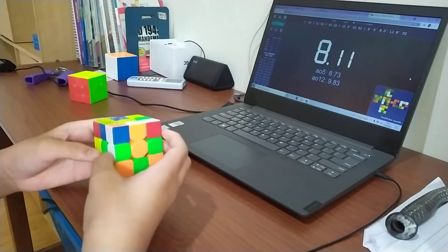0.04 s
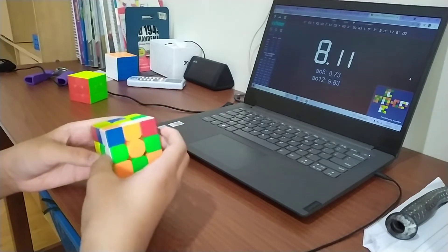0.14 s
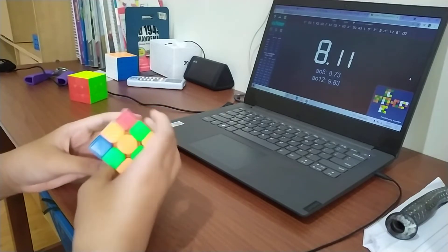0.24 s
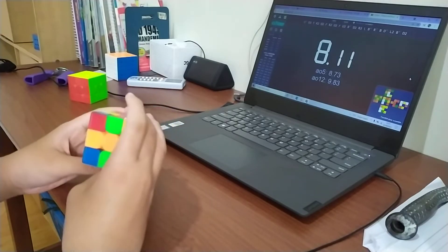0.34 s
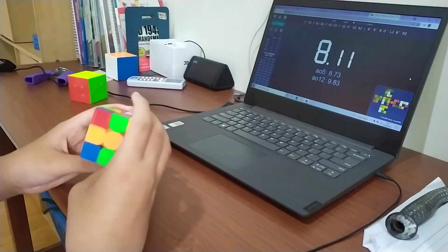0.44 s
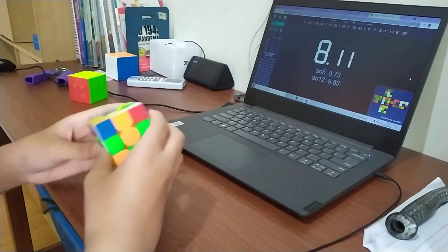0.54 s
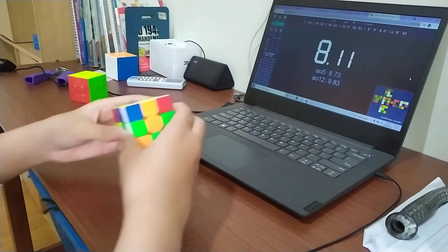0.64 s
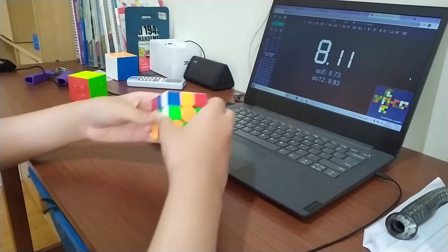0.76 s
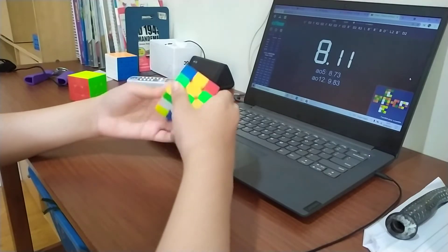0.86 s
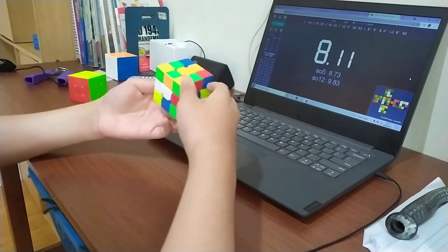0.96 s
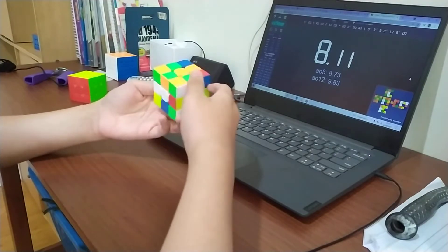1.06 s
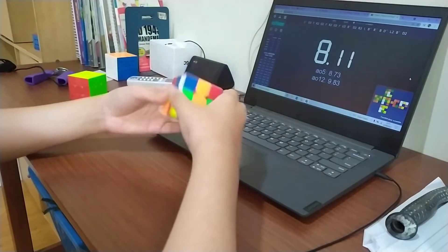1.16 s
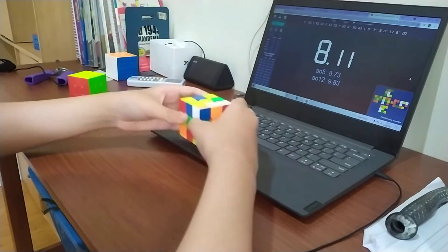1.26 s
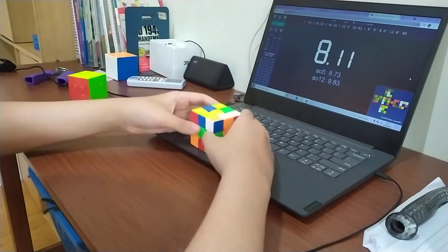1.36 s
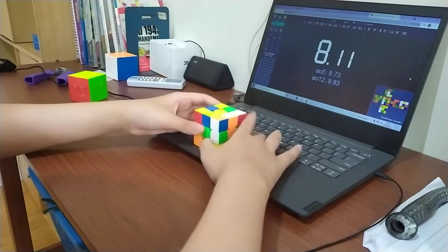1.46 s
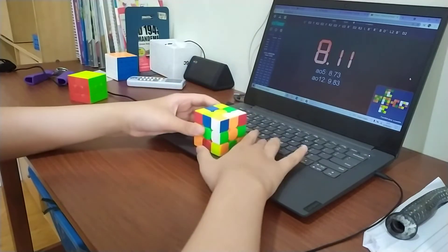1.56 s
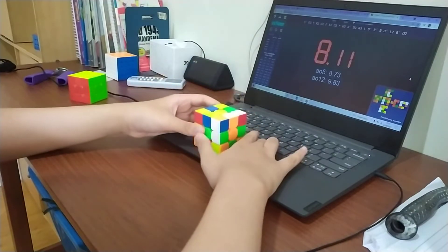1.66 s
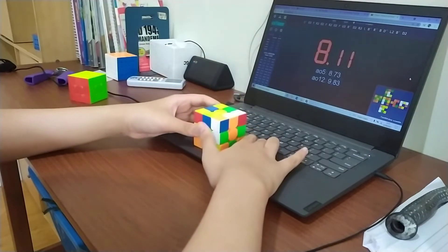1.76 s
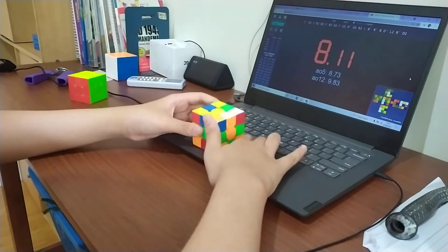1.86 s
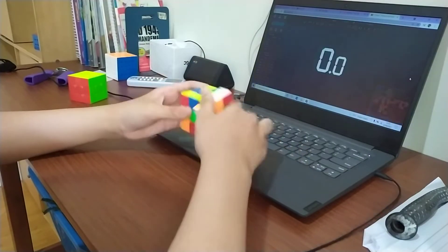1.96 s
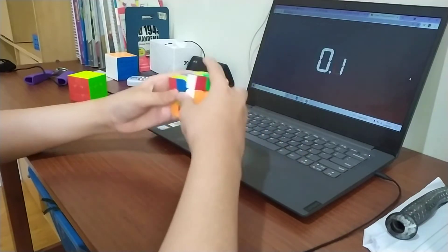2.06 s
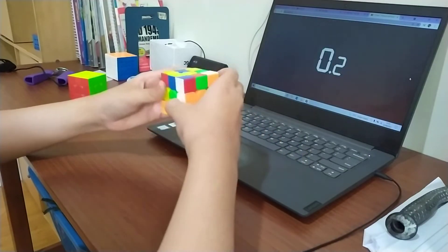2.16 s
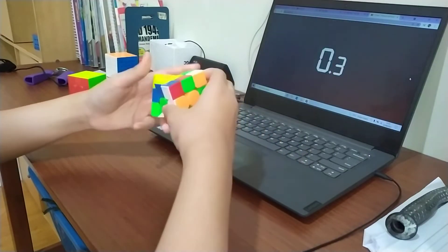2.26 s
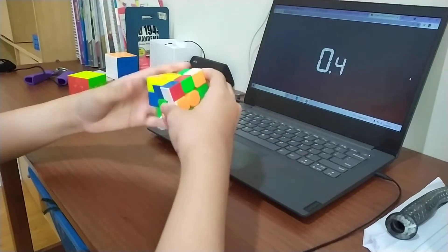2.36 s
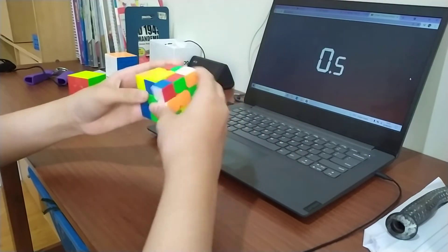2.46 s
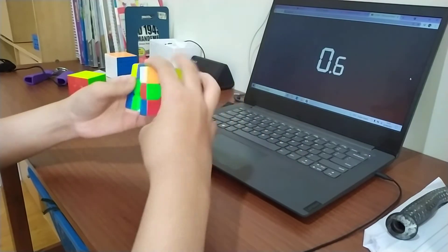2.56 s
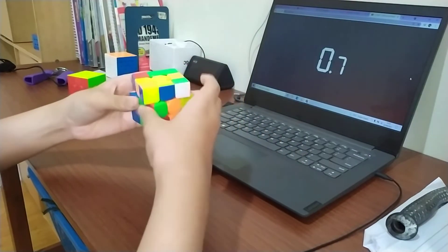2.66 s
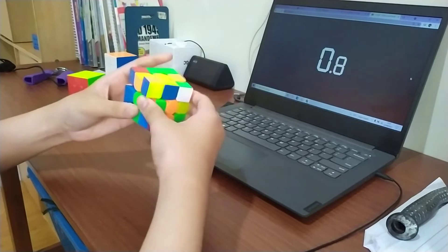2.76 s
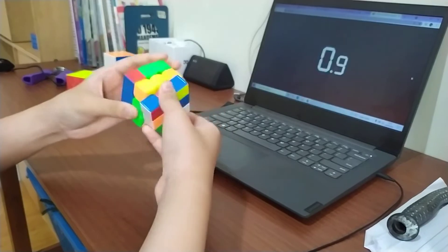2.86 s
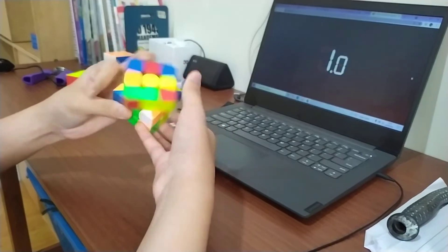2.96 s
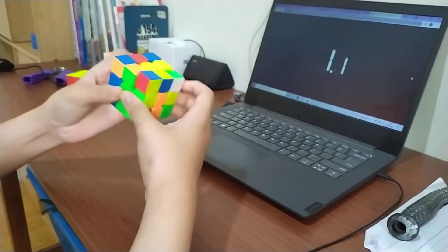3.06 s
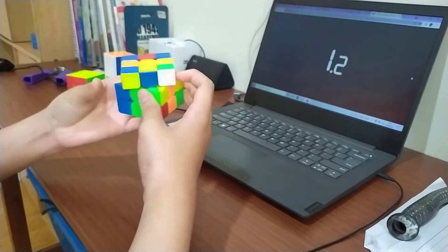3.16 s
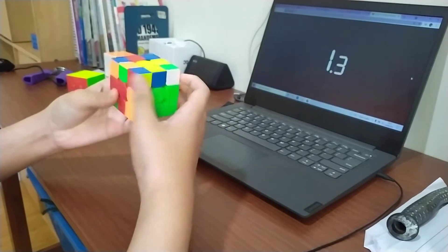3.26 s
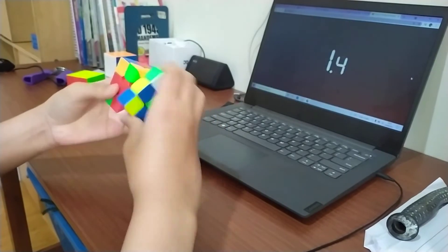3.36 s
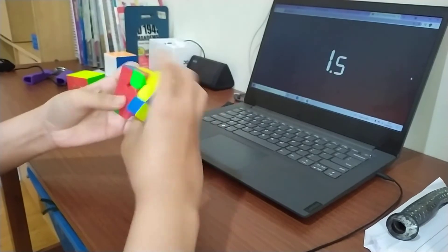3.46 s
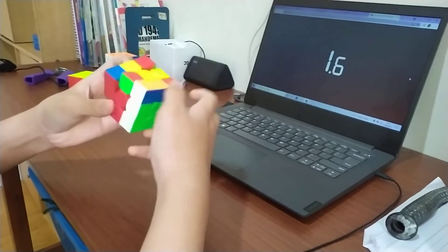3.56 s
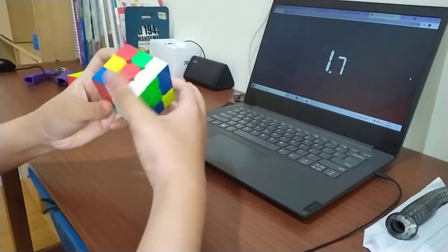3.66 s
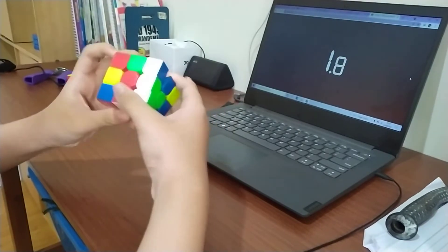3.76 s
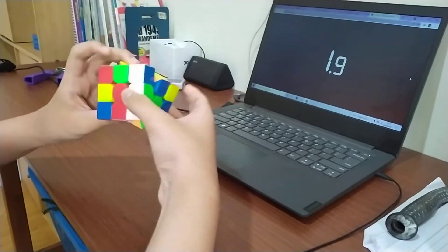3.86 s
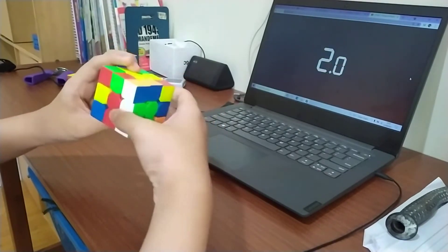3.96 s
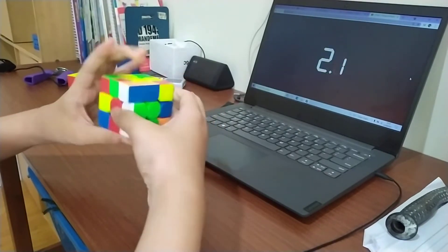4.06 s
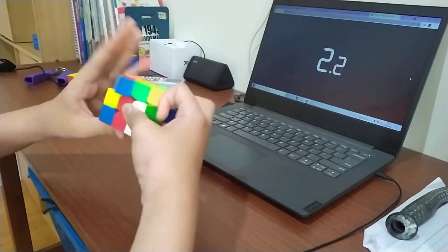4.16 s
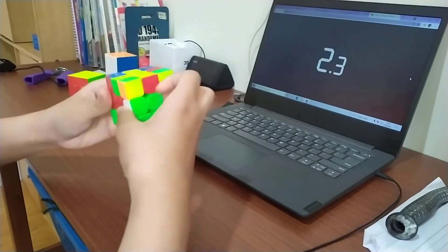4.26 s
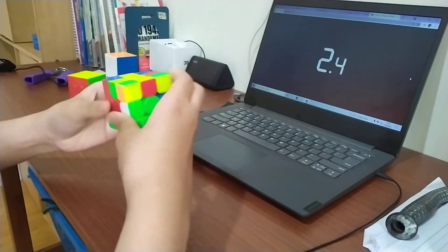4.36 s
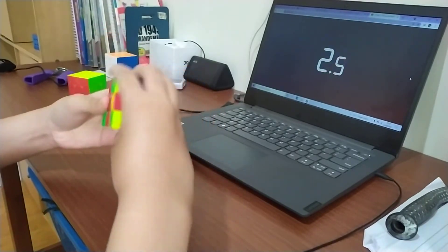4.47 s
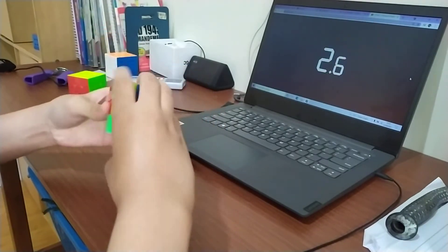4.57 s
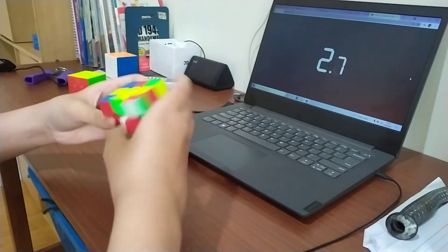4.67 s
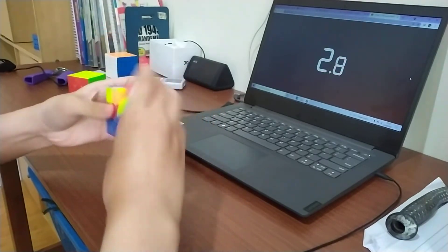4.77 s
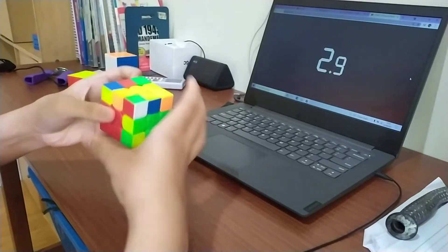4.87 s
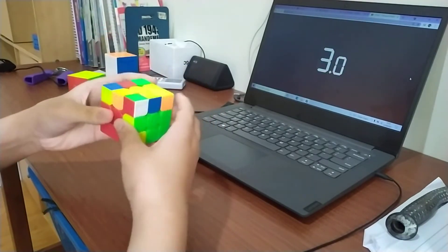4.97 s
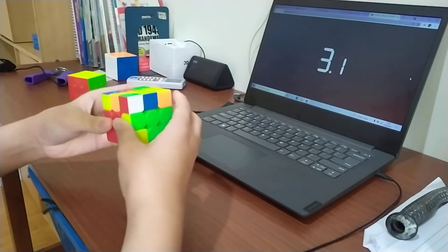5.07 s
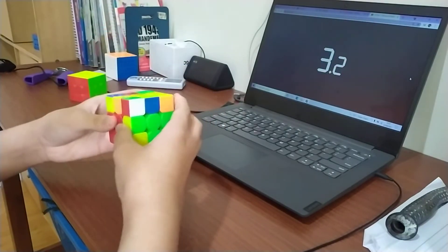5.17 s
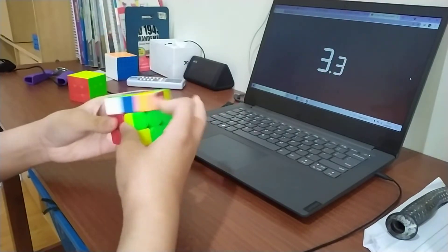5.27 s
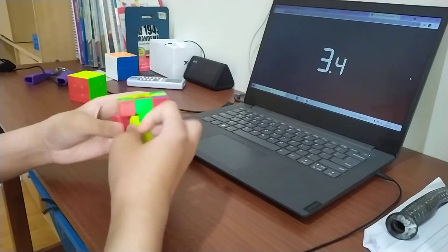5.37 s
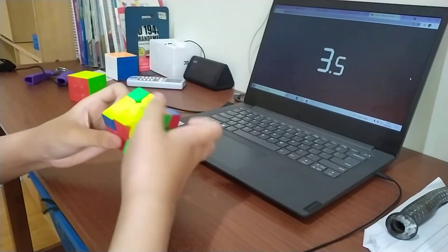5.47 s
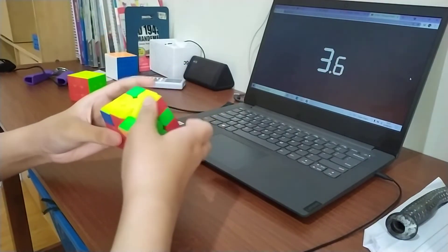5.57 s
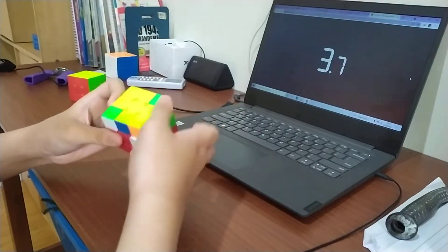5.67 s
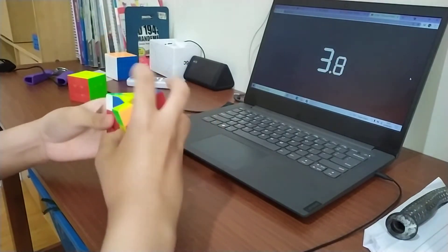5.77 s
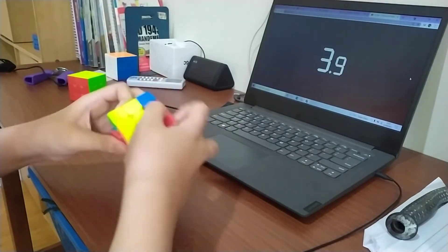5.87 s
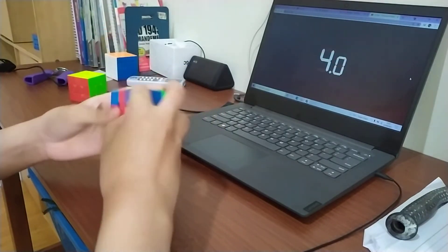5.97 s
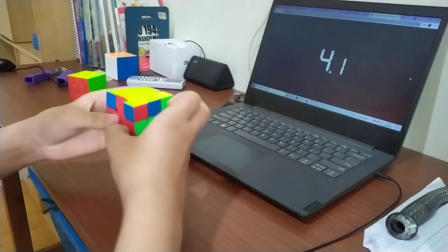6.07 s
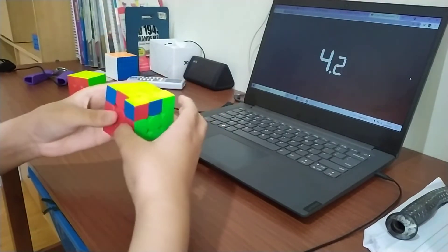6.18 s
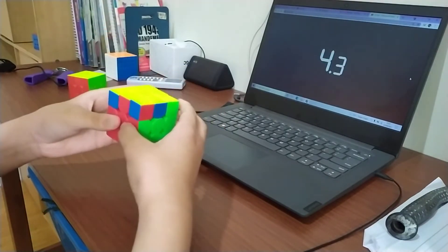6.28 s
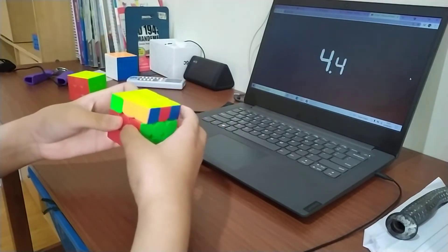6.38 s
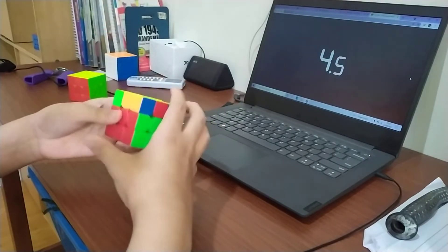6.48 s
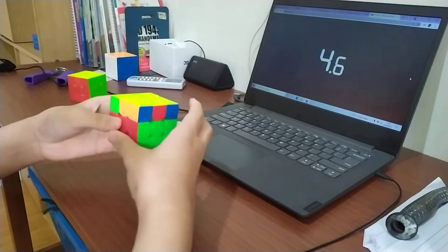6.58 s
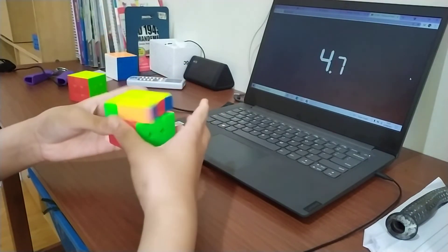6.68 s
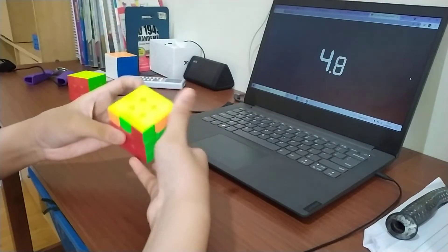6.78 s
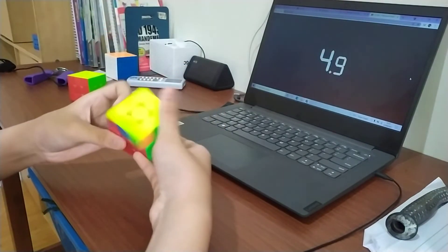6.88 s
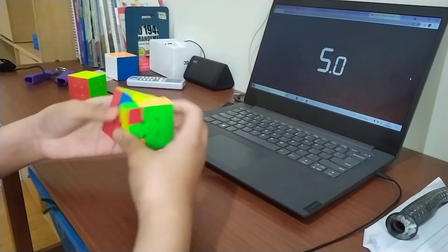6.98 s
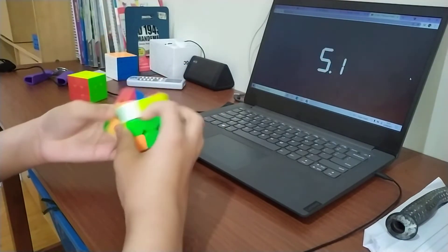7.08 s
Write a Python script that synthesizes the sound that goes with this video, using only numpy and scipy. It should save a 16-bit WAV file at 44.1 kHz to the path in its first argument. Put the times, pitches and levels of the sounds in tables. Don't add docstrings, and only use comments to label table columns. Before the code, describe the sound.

Rapid bright plastic clicks and fine rattles from a speed-turned puzzle cube, in uneven flurries over a desk, with faint hum beneath.

```python
import sys
import numpy as np
from scipy import signal
from scipy.io import wavfile

SR = 44100
rng = np.random.default_rng(int(sys.argv[2]) if len(sys.argv) > 2 else 0)


def boost_factor(decibels):
    exponent = np.asarray(decibels, float) / 20
    return 10 ** exponent


def output_pcm(signal):
    pcm = np.clip(np.atleast_2d(signal).T, -1, 1) * 32767
    wavfile.write(sys.argv[1], SR, np.round(pcm).astype(np.int16))


N = 314400

HANDLING = [(1.141, -42, -17, 0.76), (1.3872, -24, -11, 0.85), (1.4033, -36.5, -3, 2.7),
            (1.5097, -34.5, -34, 3.2), (1.538, -30.5, -15.5, 4.7), (1.8908, -46, -12.5, 0.49),
            (1.9118, -39.5, -16, 3.15), (1.9909, -29.5, -4.5, 1.16), (2.008, -30.5, -7.5, 3.6),
            (2.02, -41, -39, 2.4), (2.03, -29, -38, 1.6), (2.1272, -37, -9, 1.3)]
# seconds, dB, dB, milliseconds.
FIRST_RUN = [(2.236, -23.5, -8.5, 0.38), (2.2433, -49, -36, 1.3), (2.2605, -25.5, -13, 3.2),
             (2.2685, -19, -12.5, 1.3), (2.2744, -14, -34, 0.56), (2.2945, -14.5, -17.5, 0.54),
             (2.384, -28, -26, 1.4), (2.3975, -33.5, -8, 1.4), (2.4352, -12.5, -18.5, 1.27),
             (2.466, -15, -24, 1.33), (2.5124, -31.5, -2.5, 6.3), (2.61, -37.5, -3, 1.3),
             (2.6495, -16, -17.5, 1.83), (2.7563, -44.5, -11, 2.8), (2.8277, -40, -5, 1.9),
             (2.8395, -31, -13, 2.4), (2.8792, -33, -13.5, 5.9), (2.905, -28, -19.5, 0.41),
             (2.954, -38.5, -9, 1.9), (2.9687, -19.0, -15, 4), (2.9831, -6.5, -24.5, 0.64),
             (2.998, -12.5, -16, 0.98), (3.1518, -24, -16.5, 2.26)]
# seconds, dB, dB, milliseconds.
LATER_TURNS = [(3.2416, -19, -22, 2.6), (3.258, -14, -33, 0.37), (3.2678, -20, -21.5, 0.77),
               (3.326, -30.5, -15.5, 2.0), (3.3432, -29, -21, 1.52), (3.3773, -21.5, -11.5, 1.8),
               (3.4435, -21.5, -12.5, 3.5), (3.4676, -9, -17.5, 1.8), (3.4854, -31.5, -18, 3.2),
               (3.51, -17.5, -21.5, 1.3), (3.5275, -16.5, -27, 2), (3.677, -34.5, -10, 3.3),
               (3.7006, -18.5, -19.5, 0.79), (3.808, -34.5, -13, 1.3), (3.823, -30, -19.5, 3.8),
               (3.9298, -37.5, -14, 3.3), (3.9494, -14.5, -32, 0.54), (3.9615, -23, -25, 3.1),
               (4.0842, -31.5, -16, 3.6), (4.1175, -40.5, -13.5, 2.2), (4.125, -37, -15, 5.4),
               (4.142, -34, -6, 1.84), (4.162, -22, -12.5, 3), (4.1695, -21.5, -37.5, 1.8),
               (4.1903, -28.5, -11, 1.04), (4.2282, -19, -20, 3.4), (4.249, -14.5, -23, 1.66),
               (4.2662, -14, -18, 2), (4.2854, -13, -38, 0.54),
               (4.425, -38.5, -9, 2), (4.453, -50.5, 8, 1.5), (4.4634, -16.5, -18, 1.34),
          (4.4806, -11.5, -13.5, 0.55), (4.5087, -32.5, -16, 3.6), (4.5531, -42, -3, 1.9),
          (4.5845, -16, -14.5, 3.5), (4.592, -15, -22, 2.54), (4.6542, -23.5, -9, 2.8),
          (4.685, -8.5, -19.5, 0.69), (4.7086, -14.5, -28.5, 2.7), (4.7193, -7, -19.5, 4.5),
          (4.746, -11, -32.5, 1.4), (4.7673, -5.5, -23, 0.54), (4.8184, -10, -13, 2.7),
          (4.831, -12, -21, 1.5), (4.8438, -10.5, -29, 2.5), (4.8493, -8.5, -20.5, 5.9),
          (4.868, -25.5, -25.5, 3.8), (4.888, -24, -30.5, 2.2), (5.0364, -23.5, -30.5, 1.2),
               (5.2963, -20.5, -14, 4.9), (5.3267, -18.5, -21, 1.9), (5.3432, -15.5, -28.5, 1.4),
              (5.3524, -13, -54, 0.4), (5.3882, -31, -15, 3.9), (5.4585, -19.5, -15.5, 2.0),
              (5.475, -15, -21, 1.9), (5.487, -15.5, -16, 5), (5.6393, -24.5, -26, 1.7),
              (5.658, -38.5, -1, 1.3), (5.6722, -19, -13, 0.74), (5.6795, -24, -19, 1.2),
              (5.6848, -20, -17.5, 2.3), (5.704, -13.5, -39, 2.6), (5.743, -25.5, -10.5, 3.3),
              (5.751, -19.5, -9, 2.3), (5.77, -20.5, -23, 0.8), (5.788, -20, -25, 1.2),
              (5.809, -27.5, -12.5, 6.1), (5.8363, -19.5, -18, 2.2), (5.8504, -5, -13, 3.2),
              (5.9576, -22.5, -17, 2.2), (5.965, -30, -18, 2.5), (5.983, -11, -10, 1.8),
              (5.995, -24, -19, 1.7),
               (6.25, -20.5, -20, 1.2), (6.2628, -34.5, -36.5, 5.5), (6.33, -35, -18, 1.7),
               (6.3645, -33.5, -2, 1.3), (6.3719, -20, -17, 2.1), (6.3924, -15.5, -21, 1.8),
               (6.4553, -27, -30, 0.56), (6.6975, -21.5, -21.5, 1.6), (6.731, -29, -11.5, 2.1),
               (6.7347, -16, -36.5, 2.4), (6.764, -24.5, -9.5, 1.4), (6.8067, -26.5, -28, 2.5),
               (6.8812, -32.5, -11.5, 1.7), (6.905, -19, -27, 0.24), (6.925, -27.5, -35.5, 2.2),
               (6.9302, -23, -8.5, 3.7), (6.9792, -21, -13.5, 4.8), (7.0284, -7, -21.5, 0.13),
               (7.0425, -4, -21, 0.64), (7.0685, -8, -17, 2.2), (7.092, -20.5, -28, 0.97),
               (7.108, -11.5, -27.5, 1.5)]
# seconds, dB, dB, milliseconds.
IDLE_TICK = [
    (.772, -54, -23, 1.5),
]
# seconds, dB, dB, #
# milliseconds.
FURTHER_SNAPS = [
    (2.964, -28, -12, 1.4),
    (2.998, -7.5, -20, 0.41),
    (3.3424, -13, -24, 1.1),
    (5.3522, -7, -36, .4),
    (5.8355, -16, -24, 1.16),
                 (1.4086, -32.5, -11.5, 2.3), (1.92, -40.5, -25, 1.1), (1.931, -44.5, -25, 1),
                (1.9725, -45, -21, 1), (2.3105, -33.5, -15.5, 1.5), (2.409, -29, -12, 0.87),
                (2.522, -23, -19, 0.94), (2.552, -33, -5.5, 2.3), (2.5685, -34.5, -3.5, 2.3),
                (2.8897, -37, -19.5, 1.2), (2.9, -42, -21, 1), (2.9726, -25.5, -15, 0.87),
                (3.007, -24.5, -21.5, 1.8), (3.041, -26, -24.5, .8), (3.06, -32.5, -5, 2.3),
                (3.229, -44, -14, 1), (3.2623, -24, -20, 1), (3.426, -30.5, -16.5, 1),
                (3.519, -19.5, -13.5, 1.5), (3.7536, -37.5, -17.5, 1.1), (3.804, -25.5, -14.5, 1),
                (3.884, -44, -5, 2.3), (4.0435, -33.5, -18, 1), (4.0662, -36, -13, 1.3),
                (4.135, -35, -20.5, 1.1), (4.5948, -14.5, -21, 1.2), (4.739, -16, -20, 3.4),
                (4.8545, -14.5, -33.5, 1.6), (5.335, -22.5, -27.5, 0.45), (5.8447, -15, -37, 1.2),
                (5.855, -6, -27, 1.45), (5.871, -17, -8, 1.8), (5.979, -20, -11, 1.5),
                (6.389, -22.5, -18.5, 1), (6.9123, -34, -3.5, 2), (7.083, -22, -9, 1.2)]


def all_snaps():
    turns = FIRST_RUN + LATER_TURNS
    rows = HANDLING + turns + IDLE_TICK + FURTHER_SNAPS
    s, db, hollow_db, seat_ms = np.transpose(rows)
    bright_db = 7 + 0.2314 * db + np.log2(np.maximum(seat_ms, .2))
    bright_db += 1.5 * (s < FIRST_RUN[0][0])
    return np.transpose([s, db, bright_db, hollow_db, seat_ms])


def contacts(count=10):
    snaps = all_snaps()
    s, seat_s = snaps[:, :1], np.maximum(snaps[:, 4:], .2) / 1000
    late = rng.gamma(1.5, 1, (len(s), count)) * .5
    sizes = boost_factor(-3.5 * late) * rng.choice([-1, 1], late.shape)
    late[:, 0] = .15
    sizes[:, 0] = boost_factor(4.5 - 2.5 * np.log2(seat_s[:, 0] * 1000))
    sizes = sizes / np.linalg.norm(sizes, axis=1, keepdims=True)
    sizes = sizes * (seat_s / 0.00078) ** 0.3
    places = (s - .0003 + late * seat_s) * SR
    return np.minimum(places, N - 1).astype(int).ravel(), sizes


# start in seconds, length in seconds, rattle level in dB.
SLIDING_STROKES = [(2.262, 0.046, -45), (2.43, 0.015, -45.5), (2.52, 0.048, -47), (2.653, 0.074, -60),
                   (2.83, 0.032, -58.5), (2.979, 0.057, -38.5), (3.254, 0.018, -46), (3.37, 0.033, -51),
                   (3.446, 0.023, -40.5), (3.492, 0.065, -42.5), (4.122, 0.047, -47), (4.24, 0.029, -43.5),
                   (4.497, 0.09, -50), (4.599, 0.026, -48.5), (4.721, 0.073, -34.5), (4.795, 0.02, -37.5),
                   (4.852, 0.0096, -38.5), (5.307, 0.086, -48), (5.471, 0.02, -36.5), (5.679, 0.085, -45.5),
                   (5.77, .05, -59), (5.845, 0.025, -35.5), (5.968, 0.014, -35.5), (6.38, 0.054, -48.5),
                   (6.726, .05, -47.5), (6.906, 0.02, -49), (6.988, .03, -55), (7.063, 0.016, -35.5)]


def rattle(per_s, spread_db):
    start, length, db = np.transpose(SLIDING_STROKES)[:, :, None]
    t = np.arange(0, N + 44, 44) / SR
    rise_db = 722 * np.maximum(start - t, 0)
    fall_db = 293 * np.maximum(t - start - length, 0)
    strokes = boost_factor(db - rise_db - fall_db)
    level = np.interp(np.arange(N) / SR, t, strokes.sum(axis=0))
    sizes = boost_factor(spread_db * np.minimum(rng.exponential(1, N), 2.6)) * rng.choice([-1, 1], N)
    slips = rng.random(N) < per_s * boost_factor(3.0 * drift(30)) / SR
    return level * rms_one(sizes * slips)


# pitch in Hz, level in dB.
SMALL_PIECES = [(2600, -21.5), (3500, -14.5), (4500, -15.5), (5600, -5.5), (7000, -3), (8800, .5),
                (10500, -3.5), (12500, -15), (15500, -5)]
# pitch in Hz, level in dB, time to die by 60 dB in seconds.
HOLLOW_CORE = [(546, -19.5, 0.014), (785, -15, 0.0016), (1110, -13, 0.0059), (1346, -2.5, 0.0055),
               (1573, -5.5, 0.009), (1897, -9.5, 0.0069), (2350, -13, 0.012)]


def cube():
    s, peak_db, bright_db, hollow_db, seat_ms = all_snaps().T[:, :, None]
    slips, out = rattle(per_s=5700, spread_db=7.5), np.zeros((3, N))
    snap_places = (s[:, 0] * SR).astype(int)
    wet_db = 1.5 * np.log2(np.clip(seat_ms[:, 0], .3, 3) / 3)
    # pitch in Hz, level in dB, dying time in s, its share of each snap in dB
    shell = [(hz, at_hz(SMALL_PIECES, hz), 18.52 / hz, 0.39 * bright_db * np.log2(hz / 7500))
             for hz in np.geomspace(2700, 15300, 20)]
    core = [(hz, db + 4.5, t60, hollow_db) for hz, db, t60 in HOLLOW_CORE]
    dealt = rng.integers(0, len(shell + core), N)
    slip_aim_db = 8.0 * rng.standard_normal(N)
    for k, (hz, mode_db, t60, share_db) in enumerate(shell + core):
        at, sizes = contacts()
        blows = sizes * boost_factor(peak_db - 8.5 + share_db)
        facing_db = 1.6 * rng.standard_normal(s.shape)
        aim_db = 2.5 * rng.standard_normal(s.shape)
        lean_db = 0.61 * np.log2(hz / 1500)
        ports = [np.bincount(at, (blows * boost_factor(facing_db + way * (aim_db + lean_db))).ravel(), N)
                 for way in (1, -1)]
        low_db = hz < 2500
        all_sides_db = 0.89 * facing_db[:, 0] + wet_db - 2.0 * low_db
        strength = (-1) ** k * np.linalg.norm(blows, axis=1) * boost_factor(all_sides_db)
        evened = np.bincount(snap_places, strength, N)
        scrape = boost_factor(-4.5 + np.mean(share_db) - 1.0 * low_db) * slips * (dealt == k)
        scrape = scrape * boost_factor(np.outer([1, -1, 0], slip_aim_db + lean_db))
        out += boost_factor(mode_db) * ring(np.array([*ports, evened]) + scrape, hz, t60)
    out = signal.sosfilt(signal.butter(2, 750, "high", fs=SR, output="sos"), out)
    left = later(out[0], 7)
    return np.array([left, out[1]]), out[2]


# start in seconds, level in dB, time to die by 60 dB in seconds.
KEY_RATTLES = [
    (1.388, -40.5, 0.021),
    (1.392, -53, 0.018),
    (1.401, -63, 0.016),
    (1.536, -53.5, 0.026),
    (6.362, -53, 0.068),
]


def key():
    t = np.arange(N) / SR
    shake = sum((t >= s) * boost_factor(db - 60 * np.clip(t - s, 0, 1) / t60) for s, db, t60 in KEY_RATTLES)
    grains = rng.standard_normal(N) * (rng.random(N) < .45) * shake
    return signal.sosfilt(signal.butter(1, [380, 2400], "band", fs=SR, output="sos"), grains) * boost_factor(12)


# moment in seconds, level in dB, extra level of the upper modes in dB.
HAND_THUMPS = [
    (1.4115, -9.5, -4),
    (1.394, -19.5, 10.5),
    (1.5, -17, -12),
    (1.546, -17, 0),
    (1.909, -16.5, -4),
    (6.385, -31, 21.5),
]
# pitch in Hz, level in dB, time to die by 60 dB in
# seconds.
DESK_MODES = [(108, 0, .3), (151, -4, .3),
              (50, -18, 0.61), (246, -14, 0.26), (320, -5, 0.07), (530, -6, 0.022)]


def desk():
    s, blow_db, upper_db = np.transpose(HAND_THUMPS)
    places = (s * SR).astype(int)
    blows = [np.bincount(places, boost_factor(db), N) for db in (blow_db, blow_db + upper_db)]
    blows = signal.lfilter(*signal.butter(2, 300, fs=SR), blows)
    return sum(boost_factor(db - 26.5) * ring(blows[int(hz > 200)], hz, t60)
               for hz, db, t60 in DESK_MODES)


def bounces(near):
    desk_top = boost_factor(-10.5) * np.array([later(near[0], 52), later(near[1], 43)])
    lid = boost_factor(-6.0) * np.array([later(near[0], 118), later(near[1], 106)])
    return desk_top + lid


# pitch in Hz, time to die by 60 dB in seconds.
ROOM_DYING = [(700, 0.46), (2100, 0.34), (5600, 0.38), (12000, 0.3)]


def room(x, gap_s=.004):
    x = signal.sosfilt(signal.butter(2, 14300, fs=SR, output="sos"), x)
    t = np.arange(SR * 3 // 5) / SR
    density = np.clip(.15 + (t / .03) ** 2, 0, 1)
    arrives = (rng.random((2, len(t))) < density) / np.sqrt(density)
    arrives = arrives * (t > gap_s) * np.clip(2.1 + t / 0.022, 0, 1)
    tail = 0
    for low in 300 * 2 ** np.arange(0, 6.):
        band = signal.butter(2, [low, 2 * low], "band", fs=SR, output="sos")
        echoes = signal.sosfilt(band, arrives * rng.standard_normal(arrives.shape))
        tail = tail + echoes * boost_factor(-60 * t / at_hz(ROOM_DYING, np.sqrt(2) * low))
    tail = tail / np.sqrt(np.sum(tail ** 2) / 2)
    return boost_factor(7.5) * signal.fftconvolve(x[None], tail, axes=1)[:, :N]


# moment in seconds, pitch in Hz, level in dB.
MOTOR_COURSE = [
    (0, 200.5, -72.5),
    (2.85, 198.3, -70),
    (3.05, 201, -61.5),
    (3.7, 199.6, -59),
    (3.95, 199.3, -64.5),
    (4.3, 201, -58),
    (4.65, 200.5, -66.5),
    (5.6, 195.3, -66.5),
    (6.4, 189, -63),
    (7.13, 195, -69),
]
# pitch in Hz, level in dB, wavering width in Hz.
HUM_LINES = [
    (49, -65.5, 0.33),
    (685, -79.5, 1.62),
]


def machines():
    hz, first_db = in_time(MOTOR_COURSE)
    from_whine = (np.arange(N) / SR - 2.67) / 0.31
    second_db = first_db - 13 + 15.5 * np.exp(-from_whine ** 4)
    turn = 2 * np.pi * np.cumsum(hz + 2.0 * drift(7)) / SR
    motor = boost_factor(first_db + 2.1 * drift(8)) * np.sin(turn)
    motor = motor + boost_factor(second_db + 2.9 * drift(9)) * np.sin(2 * turn)
    hum = 0
    for hz, db, width in HUM_LINES:
        phase = 2 * np.pi * np.cumsum(hz + width * drift(15.4)) / SR
        hum = hum + boost_factor(db + 2.2 * drift(3.6)) * np.sin(phase)
    return np.sqrt(2) * (motor + hum)


# pitch in Hz, level in dB per Hz.
AIR_COLOUR = [(32, -36.5), (55, -3), (173, -5.5), (204, -10.5), (272, -11.5), (399, -13), (598, -22.5),
              (690, -22), (1380, -30.5), (15000, -39), (16500, -68)]
# moment in seconds, level in dB.
RUMBLE_LEVEL = [
    (0, -61),
    (2.2, -60.5),
    (2.7, -58),
    (3.6, -60),
    (4.2, -59.5),
    (5.4, -61),
    (5.75, -62),
    (6.2, -63.5),
    (6.8, -61),
    (7.13, -65),
]
# pitch in Hz, likeness from -1 to 1.
EAR_LIKENESS = [(60, 0.87), (240, 0.95), (950, 0.11), (3770, 0.01), (15000, 0.1)]


def air(patchy_db):
    out, edges = 0, 58 * 2 ** np.arange(0, 8.6, .5)
    white, swell_db = rng.standard_normal((2, 2, N)), in_time(RUMBLE_LEVEL)[0]
    for k, (low, high) in enumerate(zip(edges, edges[1:])):
        band = signal.butter(2, [low, high], "band", fs=SR, output="sos")
        mid, side = signal.sosfilt(band, white[k % 2])
        hz = np.sqrt(low * high)
        alike = np.clip(at_hz(EAR_LIKENESS, hz), -1, 1)
        rumble_db = (hz < 300) * (swell_db - swell_db[0] + patchy_db * drift(0.28))
        gain = boost_factor(at_hz(AIR_COLOUR, hz) + rumble_db)
        out = out + gain * (np.sqrt(1 + alike) * mid + np.sqrt(1 - alike) * side * [[1], [-1]])
    return boost_factor(-58.5) * rms_one(out)


def ring(clicks, hz, t60):
    r, w = boost_factor(-60 / (t60 * SR)), 2 * np.pi * hz / SR
    return signal.lfilter([.5, 0, -.5], [1, -2 * r * np.cos(w), r * r], clicks + 1e-18)


def drift(rate):
    r = np.exp(-80 * np.pi * rate / SR)
    chance = rng.standard_normal(N // 40 + 2002)
    slow = signal.lfilter([1], [1, -2 * r, r * r], chance)[2000:]
    return np.interp(np.arange(N) / 40, np.arange(len(slow)), rms_one(slow - slow.mean()))


def later(x, count):
    return np.concatenate([np.zeros(count), x[:-count]])


def rms_one(x):
    return x / np.sqrt(np.mean(x ** 2) + 1e-20)


def in_time(rows):
    s, *columns = np.transpose(rows)
    return [np.interp(np.arange(N) / SR, s, c) for c in columns]


def at_hz(points, hz):
    table_hz, values = np.array(points).T
    return np.interp(np.log(hz), np.log(np.maximum(table_hz, 1)), values)


def scene():
    near, all_round = cube()
    tap = key()
    direct = near + bounces(near) + tap
    return direct + room(all_round + tap) + desk() + machines() + air(patchy_db=2.0)


def band_limit(x):
    return signal.sosfilt(signal.butter(12, 16810, fs=SR, output="sos"), x)


def record(dry):
    dry = signal.sosfilt(signal.butter(5, 42, "high", fs=SR, output="sos"), dry)
    rounded = 0.62 * np.tanh(dry / 0.59)
    mix = signal.sosfilt(signal.cheby2(12, 28, 16050, fs=SR, output="sos"), rounded)
    mix = signal.sosfilt(signal.cheby2(10, 40, 16900, fs=SR, output="sos"), mix)
    return band_limit(mix)


dry = scene()
out = record(dry)
output_pcm(out)
```